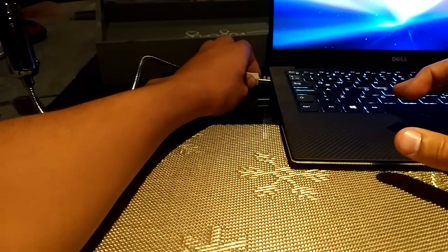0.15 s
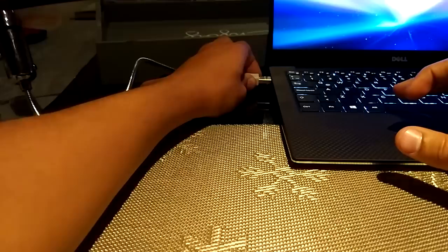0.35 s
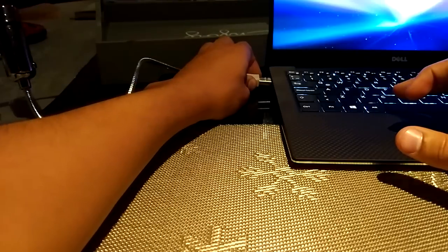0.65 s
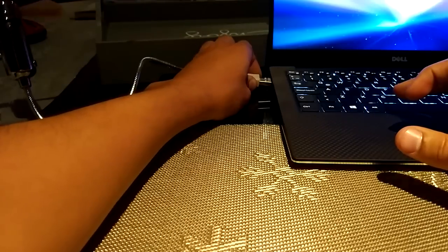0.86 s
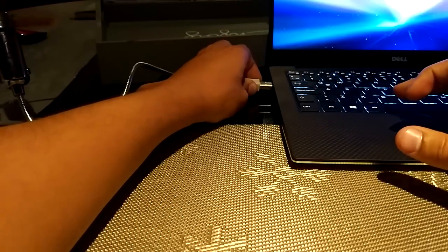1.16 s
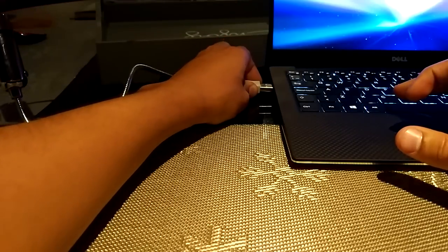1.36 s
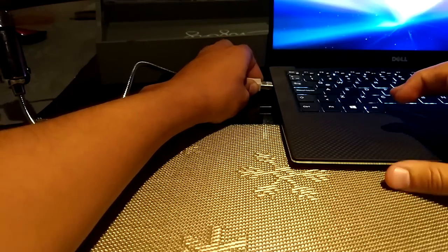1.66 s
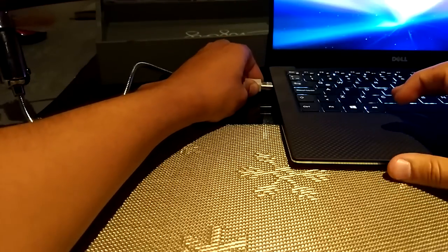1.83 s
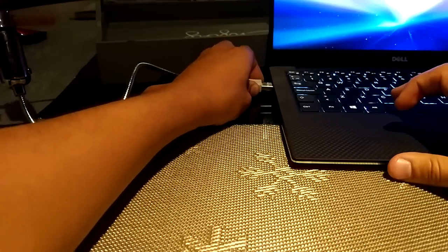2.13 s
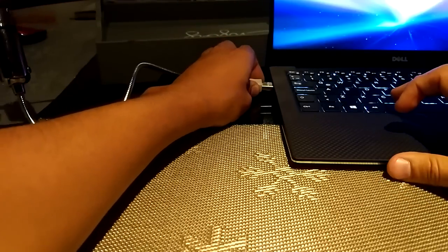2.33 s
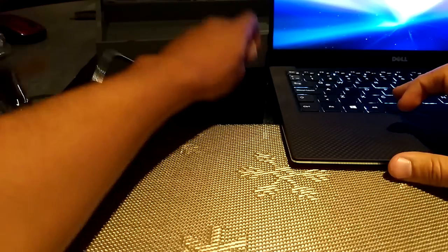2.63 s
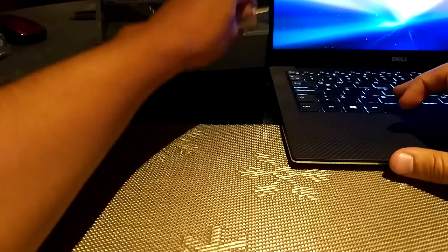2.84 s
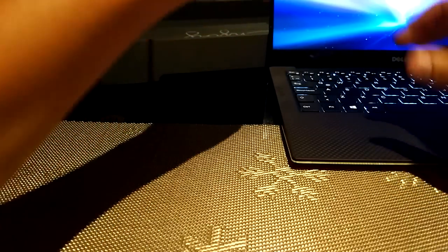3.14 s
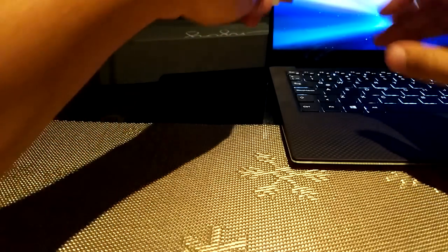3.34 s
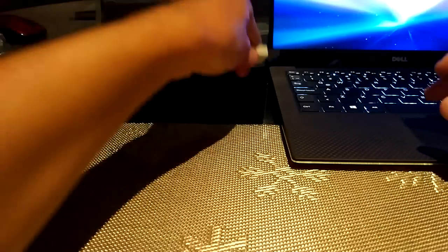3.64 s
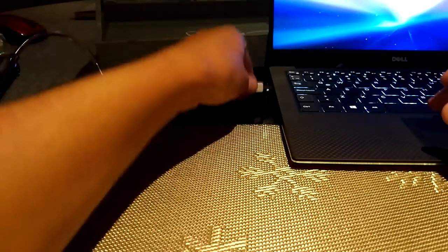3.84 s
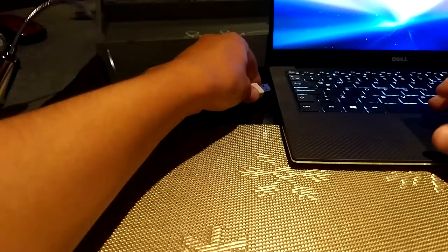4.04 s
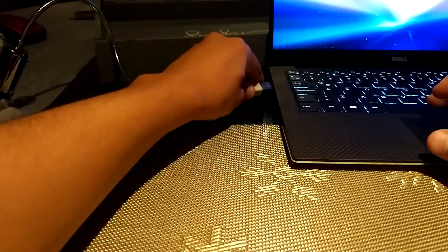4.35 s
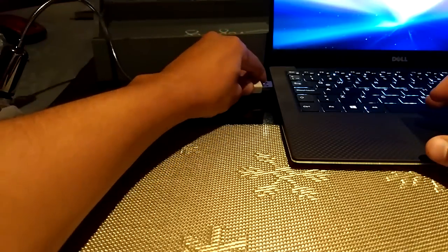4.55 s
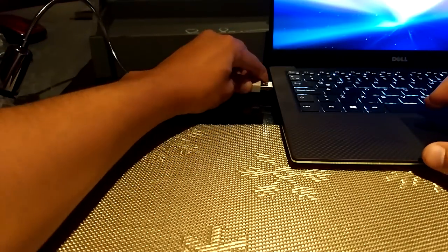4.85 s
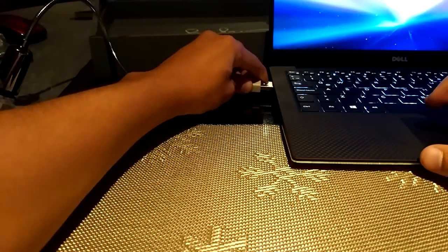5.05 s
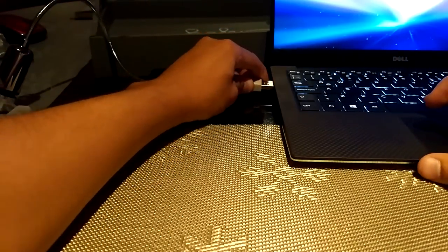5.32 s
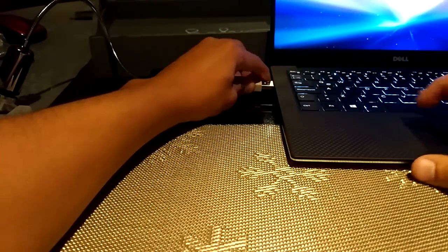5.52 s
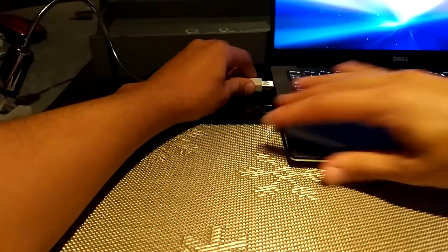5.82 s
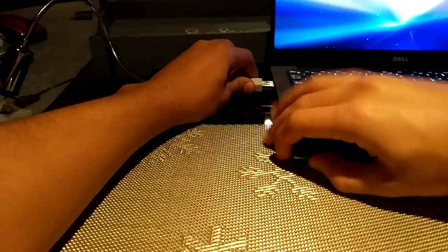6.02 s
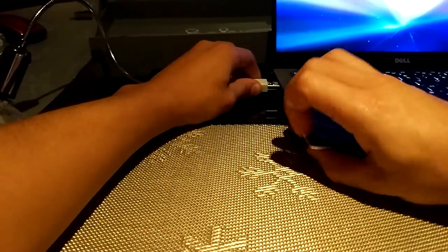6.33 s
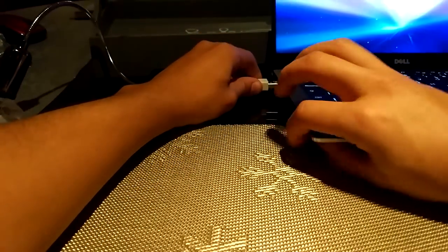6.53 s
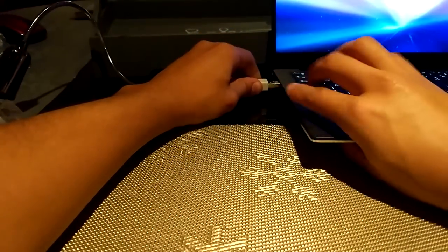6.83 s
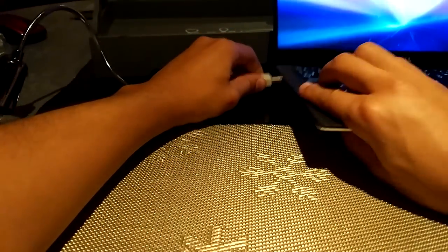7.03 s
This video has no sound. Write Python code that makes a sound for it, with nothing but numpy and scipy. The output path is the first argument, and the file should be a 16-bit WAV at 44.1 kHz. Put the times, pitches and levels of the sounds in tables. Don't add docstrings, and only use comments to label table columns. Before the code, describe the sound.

Small metallic clicks and plastic case knocks, a sudden bright clatter with a table thud, then light scrapes over a faint fan hum.

```python
import sys
import numpy as np
from scipy import signal
from scipy.fft import rfft, irfft, next_fast_len
from scipy.io import wavfile
from scipy.ndimage import uniform_filter1d

SR = 44100
rng = np.random.default_rng(int(sys.argv[2]) if len(sys.argv) > 2 else 0)


def dump(signal):
    limited = np.clip(np.atleast_2d(signal).T, -1, 1)
    pcm = np.round(limited * 32767).astype(np.int16)
    wavfile.write(sys.argv[1], SR, pcm)


def rack_gain(trim_db):
    fader = np.asarray(trim_db, float)
    return 10 ** (fader / 20)


N = 316638


def evened(x):
    return x / np.sqrt(np.mean(x ** 2) + 1e-20)


def read(points, hz):
    f, value = np.transpose(points)
    return np.interp(np.log(hz + 1), np.log(f + 1), value)


def colour(x, points):
    size = next_fast_len(x.shape[-1])
    gain = rack_gain(read(points, np.fft.rfftfreq(size, 1 / SR)))
    return irfft(rfft(x, size) * gain, size)[..., :x.shape[-1]]


def resonate(x, hz, width):
    pole = np.exp((2j * np.pi * hz - np.pi * width) / SR)
    return 2 * signal.lfilter([1 - abs(pole)], [1, -pole], x).real


def mode(t, hz, db, t60, phase):
    return rack_gain(db - 60 * t / t60) * np.sin(2 * np.pi * (hz * t + phase))


def add(mix, s, sound):
    part = mix[..., round(s * SR):][..., :sound.shape[-1]]
    part += sound[..., :part.shape[-1]]


# (frequency [Hz], level [dB])
TONE_SPECTRUM = [(15, -91), (25, -30), (74, -52), (108, -26.5), (140, -31), (160, -16.5), (232, -3),
                 (337, -11.5), (406, -10), (451, -15), (488, -13), (923, -16.5), (1170, -17), (3210, -30.5),
                 (14200, -34.5)]
# (time [s], level [dB])
ARM_STIR = [(0.0, -50), (2.56, -50.5), (2.8, -46.5), (3.16, -51), (3.58, -49.5), (3.72, -43), (4.1, -48.5),
            (4.56, -49), (5.0, -46.5), (5.46, -47.5), (6.56, -46), (7.18, -45)]
# (frequency [Hz], coherence [-1 to 1])
COHERENCE = [(60, 0.7), (120, 0.92), (240, 0.97), (480, 0.41), (950, -0.4), (1890, -0.15), (3770, -0.14),
             (7520, -0.23), (15000, 0.6)]


def room_tone():
    frames, hz = N // 512 + 5, np.fft.rfftfreq(2048, 1 / SR)
    a, b, c, d, patches = rng.standard_normal((5, len(hz), frames))
    patches = evened(uniform_filter1d(uniform_filter1d(patches, 16, 0), 6, 1))
    left, other = a + 1j * b, c + 1j * d
    same = np.clip(read(COHERENCE, hz), -1, 1)[:, None]
    z = np.array([left, same * left + np.sqrt(1 - same ** 2) * other])
    z *= rack_gain(read(TONE_SPECTRUM, hz)[:, None] + 1.0 * patches)
    steady = signal.istft(z.mean(0), nperseg=2048, noverlap=1536)[1]
    scale = rack_gain(-54.5) / np.sqrt(np.mean(steady ** 2))

    s, stir_db = np.transpose(ARM_STIR)
    stir_db = np.interp(np.arange(frames) * 512 / SR, s, stir_db - np.median(stir_db) + 2.0)
    low = 1 / (1 + (hz / 2500) ** 2) / (1 + (150 / (hz + 1)) ** 4)
    z *= rack_gain(low[:, None] * stir_db)
    return scale * signal.istft(z, nperseg=2048, noverlap=1536)[1][:, :N]


# (frequency [Hz], level [dB])
FAN_LINES = [(177.6, -69), (242.2, -70), (409.1, -72.5), (479.1, -71.5), (527.6, -70.5), (1174, -79.5)]


def fan():
    hum = np.zeros(N)
    for hz, db in FAN_LINES:
        line = resonate(resonate(rng.standard_normal(N), hz, 9.7), hz, 9.7)
        hum += rack_gain(db + 3) * evened(line)
    return hum


def matched(bare, sound):
    return bare * np.linalg.norm(sound[0]) / np.linalg.norm(bare)


def crackle(share, t60, db, hz, band_hz):
    t = np.arange(2048) / SR
    grit = rng.standard_normal((2, len(t)))
    grit[1] = .5 * grit[0] + 1.28 * grit[1]
    grit *= (1 - np.exp(-t / 0.001)) * (rack_gain(-60 * t / t60) + 0.046 * rack_gain(-60 * t / 0.073))
    impulse = 1.0 * (t == 0)
    tick, bare = (resonate(resonate(g, hz, band_hz), hz, band_hz) + share * g for g in (grit, impulse))
    tick *= rack_gain(db + 1.5) / abs(tick).max()
    return tick, matched(bare, tick)


# (frequency ratio, level [dB], t60 [s])
CASE_MODES = [(1.016, 4, 0.011), (.82, -20.5, 0.059), (1.056, -15.0, 0.017),
              (1.514, -16.5, 0.02), (2.1, -16.5, 0.016), (0.559, -16.5, 0.022)]


def case_knock(db, hz):
    t = np.arange(2048) / SR
    knock = np.zeros((2, len(t)))
    for ratio, mode_db, t60 in CASE_MODES:
        port_phase = rng.random() * np.array([[0.19], [0]])
        knock += mode(t, hz * ratio, mode_db, t60, port_phase + rng.random())
    knock *= rack_gain(db + 17.5) * (1 - np.exp(-t / .0012)) ** 2
    bare = resonate(resonate(1.0 * (t == 0), hz, 1.2 * hz), hz, 1.2 * hz)
    return knock, matched(bare, knock)


def strike(near, far, s, blow, room_db):
    sound, bare = blow
    add(near, s, sound)
    add(far, s, rack_gain(room_db) * bare)


# (time [s], tick level [dB], tick pitch [Hz], knock level [dB], knock pitch [Hz])
PORT_TOUCHES = [(0.1231, -46, 2540, -57, 1000), (0.2135, -52, 3200, -61.5, 1260),
                (0.5719, -31.5, 3280, -51.5, 1110), (0.7741, -35, 2760, -54, 2100),
                (1.6008, -31, 4800, -32.5, 1264), (1.6185, -42, 3600, -47, 980),
                (1.7115, -37, 6570, -40, 1110), (1.9671, -27, 10500, -34, 1183),
                (2.603, -39.5, 4310, -59, 1750), (2.8643, -38, 2780, -51, 960),
                (4.0298, -34, 3420, -58, 923), (4.6309, -43, 4380, -57, 954), (4.811, -32, 5600, -37, 1190),
                (4.8276, -39.5, 5000, -55, 1260), (5.0222, -42, 2770, -55, 1190),
                (5.2135, -59.5, 3120, -49.5, 895), (5.3677, -43, 2800, -49, 1200),
                (5.9959, -33, 3000, -48.5, 2210), (6.1882, -36, 3500, -55, 2320),
                (7.0404, -40, 4500, -54.5, 1090), (7.1652, -40, 8730, -58, 1040)]


def touches(near, far):
    for s, tick_db, tick_hz, knock_db, knock_hz in PORT_TOUCHES:
        strike(near, far, s, crackle(0.27, 0.0077, tick_db, tick_hz, 1.3 * tick_hz), -14.5)
        strike(near, far, s, case_knock(knock_db, knock_hz), -14.5)


# (time [s], low mode [dB], middle mode [dB], high modes [dB], rise [s])
TABLE_JOLTS = [(0.571, -38.5, -50, -52, 0.0032), (0.779, -42.5, -67, -59, 0.004),
               (1.601, -43, -56, -50, 0.004), (1.968, -37, -46, -44, 0.0055),
               (2.584, -61, -56, -46.5, 0.0097), (2.625, -62, -66, -48, 0.018),
               (2.861, -68, -62, -43, 0.0036), (2.894, -44, -57, -64, 0.0055),
               (3.558, -23, -28.5, -26, 0.009), (3.571, -25, -36, -49, 0.0068),
               (3.704, -36.5, -40, -35.5, 0.0054), (3.716, -28, -41, -49, 0.0078),
               (3.812, -55, -49, -41, 0.0077), (4.056, -48, -55, -48, 0.0032),
               (4.273, -30.5, -36.5, -31, 0.0018), (4.291, -37, -58, -39, 0.0053),
               (5.999, -38, -53, -49.5, 0.0031), (6.217, -33.5, -40, -44, 0.004),
               (6.241, -45, -58, -34.5, 0.0068), (6.687, -35.5, -51, -61, 0.0036),
               (6.799, -32, -65, -58, 0.0035)]
# (frequency [Hz], level [dB], t60 [s])
TABLE_MODES = [(280.2, 4, 0.045), (480, 11.5, 0.047), (630, -4, 0.087), (704.2, 1.5, 0.11)]


def thuds(near, far):
    t = np.arange(SR // 2) / SR
    for s, low_db, middle_db, high_db, rise in TABLE_JOLTS:
        sound = np.zeros(len(t))
        for jolt_db, (hz, db, t60) in zip([low_db, middle_db, high_db, high_db], TABLE_MODES):
            sound += mode(t, hz * rng.normal(1, 0.0068), jolt_db + db, t60, rng.random())
        sound *= 1 - np.exp(-t / rise)
        add(near, s, sound[None])
        add(far, s, rack_gain(-4.5) * sound)


def sound_notes(near, far, notes):
    t = np.arange(SR // 2) / SR
    for s, db, hz, t60 in notes:
        note = mode(t, hz, db, t60, rng.random(2)[:, None] * 0.25)
        note *= 1 - np.exp(-t * hz / 2.6)
        add(near, s, note)
        add(far, s, rack_gain(-12) * note[0])


# (time [s], level [dB], frequency [Hz], t60 [s])
SHELL_PINGS = [(1.9672, -23, 5170, .012), (1.9674, -20, 6450, .014), (1.9674, -28, 3250, .02),
               (1.9674, -31, 2640, .016), (1.985, -46, 1650, .15), (1.601, -38, 2100, .02),
               (1.601, -33, 3200, .012), (2.866, -45, 760, .08), (1.7118, -35, 6400, .012),
               (2.603, -43, 4310, .025), (4.2725, -36, 4760, .03), (4.29, -48, 4764, .4),
               (4.295, -42, 3360, .15), (4.3, -48, 2283, .3), (4.3, -44, 1615, .25),
               (3.704, -32, 1950, .04), (3.704, -31, 2330, .06), (3.704, -38, 3830, .12),
               (6.189, -44, 3600, .02), (6.219, -44, 2050, .03), (6.219, -46, 2750, .03),
               (6.24, -46, 2000, .03), (6.225, -44, 3500, .06), (.5722, -44, 2150, .025),
               (4.505, -42, 480, .04)]


def pings(near, far):
    sound_notes(near, far, SHELL_PINGS)


# (time [s], tick level [dB], tick pitch [Hz])
LIGHT_GRAZES = [(1.957, -44, 4000), (2.125, -42, 5500), (2.5684, -48.5, 2650), (2.6868, -46.5, 6000),
                (2.794, -44, 3800), (2.836, -49, 8820), (3.1434, -45, 2770), (3.211, -39.5, 11500),
                (3.3158, -43, 10600), (4.0962, -27, 7940), (5.684, -41.5, 4600), (5.731, -29.5, 8640),
                (5.8417, -50.5, 5040), (6.306, -41, 7000), (6.327, -37, 11000), (6.5077, -33.5, 7700),
                (6.6397, -45, 9730), (6.8003, -40, 10800), (7.1538, -30.5, 8200), (6.7387, -48, 7600),
                (6.937, -48, 12000), (7.1124, -47, 8700), (5.794, -41, 9500), (3.229, -46, 12500)]


def grazes(near, far):
    for s, db, hz in LIGHT_GRAZES:
        strike(near, far, s, crackle(.08, 0.0064, db, hz, 4600), -14.5)
        strike(near, far, s, case_knock(db - 26, 1150), -14.5)


# (time [s], level [dB], pitch [Hz], room send [dB])
HARD_SNAPS = [(3.5364, -35, 10000, -8), (3.5418, -30, 11100, -17), (3.5524, -18, 3900, -11),
              (3.5526, -20, 11000, -11), (3.5577, -20, 6300, -4), (3.5692, -8.5, 10500, 0),
              (3.5693, -15.5, 3120, -2), (3.5698, -17, 4300, -3), (3.5727, -14.5, 9000, -8),
              (3.704, -17, 8900, -3), (3.7035, -22, 2060, -11), (3.719, -14, 9400, -2.5),
              (3.7324, -30, 9320, -21), (4.2715, -24, 7500, -2), (4.272, -26, 4430, -4),
              (4.272, -25, 1930, -12), (4.2806, -31, 2330, -9), (4.5028, -47, 4420, -3),
              (4.8541, -49, 10000, 4), (6.2189, -35.5, 2300, 0), (6.239, -36, 2600, -6),
              (1.9672, -25, 5170, -12), (1.967, -25, 6450, -6), (1.9674, -28.5, 2900, -11),
              (4.233, -40, 2300, -10), (4.2335, -34, 9200, -10), (6.189, -43, 2400, -12),
              (6.274, -46, 2200, -8)]
# (time [s], level [dB], pitch [Hz], room send [dB])
HARD_KNOCKS = [(1.9672, -35, 1496, -11), (3.5418, -50, 870, -17), (3.5525, -46, 2580, 4),
               (3.5574, -34, 940, 6), (3.5692, -39.5, 2390, -1), (3.5693, -36, 430, -4),
               (3.704, -36.5, 2040, -1), (3.707, -35.5, 960, -4.5), (3.7194, -34, 937, -2),
               (4.2715, -35, 2420, -9), (4.2715, -27, 1255, -1), (4.272, -32.5, 990, -11),
               (4.2804, -37, 1440, -7), (4.2914, -35, 1110, -4), (4.5028, -50, 1300, -3),
               (4.5187, -53, 1110, 0.5), (4.8541, -53, 890, 4), (6.2178, -42, 1110, 1),
               (6.219, -42, 1380, -9), (6.2394, -41, 970, -15)]


def hard_blows(near, far):
    for s, db, hz, room_db in HARD_SNAPS:
        strike(near, far, s, crackle(0.27, 0.0062, db, hz, 0.5 * hz), room_db)
    for s, db, hz, room_db in HARD_KNOCKS:
        strike(near, far, s, case_knock(db, hz), room_db)


# (time [s], level [dB], frequency [Hz], t60 [s])
GRIP_BOUNCES = [(3.725, -33, 957, 0.066), (3.765, -43, 985, .1), (3.81, -43, 950, .08),
                (3.845, -43, 960, 0.065), (3.85, -41, 717, .06), (3.905, -49, 740, .06),
                (3.925, -46, 900, .08), (3.94, -47, 680, 0.076), (4.064, -41, 1020, 0.045),
                (3.612, -40, 1300, 0.037), (3.72, -34, 2290, 0.069), (6.335, -54, 1270, .15),
                (6.39, -50, 1270, 0.17), (6.43, -52, 1250, .08), (1.968, -42, 630, 0.054)]


def bounces(near, far):
    sound_notes(near, far, GRIP_BOUNCES)


# (time [s], level [dB])
SLEEVE_TOUCHES = [
    (1.972, -41.5),
    (4.275, -44),
]
# (frequency [Hz], t60 [s])
SLEEVE_MODES = [(1600, .03), (2520, 0.027)]


def sleeve(far):
    t = np.arange(SR // 2) / SR
    for s, db in SLEEVE_TOUCHES:
        add(far, s, sum(mode(t, hz, db, t60, rng.random()) for hz, t60 in SLEEVE_MODES))


# (rise [s], top time [s], fall [s], pressure [dB], dull share [dB])
CABLE_STROKES = [(.04, 2.786, 0.054, -58, -1), (0.029, 2.84, 0.052, -53, -1), (.04, 2.7, .04, -69, 2),
                 (.04, 3.076, .2, -60.5, -2.5), (.04, 3.9, 0.15, -59.5, 2), (0.059, 4.026, 0.054, -45, -5),
                 (.05, 4.09, 0.11, -55.5, 0), (0.065, 4.235, 0.2, -47, -3),
                 (0.0066, 4.272, 0.079, -43, 6.5), (.02, 4.635, 0.087, -66, 4.5),
                 (0.055, 4.745, .02, -63.5, -0.5), (0.095, 6.37, 0.055, -52.5, -3),
                 (.05, 6.42, .2, -63.5, 1.5), (.015, 6.508, 0.048, -60, -18),
                 (.012, 6.642, 0.11, -56.5, -13), (0.042, 6.757, .025, -57.5, -3),
                 (.014, 6.2, 0.032, -56, -8), (.015, 6.906, .1, -60.5, -2), (.05, 7.05, .05, -64.5, 4),
                 (0.089, 7.112, .07, -55, -10), (.05, 7.175, .02, -57, -4)]
# (rise [s], top time [s], fall [s], pressure [dB], dull share [dB])
HAND_STROKES = [
    (0.064, 3.228, 0.018, -60.5, -11),
    (.02, 5.68, .02, -63, -10),
    (0.081, 5.792, .012, -54.5, -12),
    (.012, 5.745, .07, -58.5, -7),
    (.02, 5.3, .02, -69, -3),
    (.01, 6.305, 0.046, -67, -11),
    (.012, 6.655, 0.071, -63, -14),
    (.01, 6.915, 0.026, -65, -8),
]
# (frequency [Hz], density [dB per Hz])
CABLE_FIZZ = [(3290, -19), (5600, -4), (6330, -2), (9500, 1), (11500, 0), (14000, -11)]
# (frequency [Hz], density [dB per Hz])
HAND_FIZZ = [(3500, -30), (5000, -9), (8000, -3), (12500, 1), (14500, -3)]


def rubs():
    out = np.zeros((2, N))
    unevenness = evened(uniform_filter1d(rng.standard_normal(N), 90))
    slips = rng.standard_normal((2, N)) * rack_gain(2.9 * unevenness)
    slips[1] += 0.23 * slips[0]
    scrape = evened(colour(slips[:, ::-1], [(700, -24), (2200, 11), (5000, 3.5), (8000, -7)]))
    t, t_fine = np.arange(0, N + 32, 32) / SR, np.arange(N) / SR
    for strokes, pan_db, rub in [(CABLE_STROKES, 2.5, CABLE_FIZZ), (HAND_STROKES, 14.5, HAND_FIZZ)]:
        fizz = evened(colour(slips, [(2500, -55)] + list(rub)))
        bright, dull = np.zeros((2, len(t)))
        for rise, top, fall, pressure_db, dull_db in strokes:
            away = np.where(t < top, (top - t) / rise, (t - top) / fall)
            power = rack_gain(2 * (pressure_db - 18 * np.minimum(away, 8) ** 1.33))
            bright += power
            dull += rack_gain(2 * dull_db) * power
        rubbing = np.interp(t_fine, t, np.sqrt(bright)) * fizz
        rubbing += np.interp(t_fine, t, np.sqrt(dull)) * scrape
        out += rack_gain(np.array([pan_db, -pan_db]) / 2)[:, None] * rubbing
    return out


# (time [s], level [dB], share of ring time the hand leaves)
CABLE_END_STRIKES = [
    (3.5525, -18, .8),
    (3.5693, -9, .75),
    (3.704, -16, .65),
    (3.7196, -18, .6),
]
# (frequency [Hz], level [dB], t60 [s])
METAL_MODES = [(1906, -8, .3), (2659, -8, .3), (2896, -6, .3), (3055, -4, .3), (3219, -9, .3),
               (3408, -5, .3), (3674, -4, .35), (3919, -4, .35), (4188, -3, .18), (4328, -2, .25),
               (4642, -4, .23), (4830, -5, .2), (4958, -9, .25), (5160, -4, .3), (5680, -1, .3),
               (5938, -6, .2), (6170, -6, .3), (6749, 3, .2), (7095, -8, .3), (7709, 3, .18),
               (8319, -5, .2), (9118, -2, .2), (9308, -3, .25), (9997, -5, .2), (10680, -2, .2),
               (10915, -3, .2), (11385, -1, .2), (12099, -2, .25), (13600, -6, .2), (14031, -1, .25),
               (14190, 2, .2)]


def cable_end(near, far):
    t = np.arange(SR // 2) / SR
    for s, strike_db, free in CABLE_END_STRIKES:
        ring = np.zeros(len(t))
        for hz, db, t60 in METAL_MODES:
            ring += mode(t, hz, db + 2.5 * rng.standard_normal(), free * t60, rng.random())
        add(near, s, rack_gain(strike_db - 30) * ring[None])
        add(far, s, rack_gain(strike_db - 35) * ring)


# (frequency [Hz], t60 [s])
ROOM_T60 = [(200, 0.44), (600, 0.43), (1500, 0.65), (4000, 0.7), (8000, 0.48), (14000, 0.36)]


def room(x):
    size = SR // 2
    taps = np.zeros((2, size))
    at = np.arange(120, size - 20, 20)
    at = at + rng.integers(0, 20, (2, len(at)))
    np.put_along_axis(taps, at, rng.choice([-1., 1.], at.shape), 1)
    taps *= np.clip(np.arange(size) / SR / .01, 0, 1) ** 2
    hz, t, z = signal.stft(taps, SR, nperseg=256)
    bass = 1 / (1 + (hz[:, None] / 500) ** 3)
    z[1] = bass * z[0] + np.sqrt(1 - bass ** 2) * z[1]
    tail = signal.istft(z * rack_gain(-60 * t / read(ROOM_T60, hz)[:, None]), SR, nperseg=256)[1]
    tail /= np.linalg.norm(tail, axis=1)[:, None]
    return signal.fftconvolve(x[None], tail, axes=1)[:, :N]


# (frequency [Hz], left over right [dB])
LEFT_TREBLE = [(200, -1), (500, -1), (1000, 1), (2000, -.5), (4000, 1), (8000, 4), (12000, 10), (14000, 11)]
# (frequency [Hz], gain [dB])
LOW_CUT = [(30, -29), (70, -28), (110, -22), (170, -4), (230, 0)]


def ports(near, far, sliding):
    near[1] = np.roll(near[1], round(.00007 * SR))
    heard = near + room(far + rack_gain(-6.5) * sliding.mean(0))
    half = np.array(LEFT_TREBLE) * [1, .5]
    heard = np.array([colour(heard[0], half), colour(heard[1], half * [1, -1])])
    return colour(heard + sliding, LOW_CUT)


def scene():
    tone = room_tone() + fan()
    near, far = np.zeros((2, N)), np.zeros(N)
    for source in (touches, thuds, pings, grazes, hard_blows, bounces):
        source(near, far)
    sleeve(far)
    sliding = rubs()
    cable_end(near, far)
    return ports(near, far, sliding) + tone


# (frequency [Hz], gain [dB])
BAND_LIMIT = [(13900, 0), (14200, -5), (14500, -36), (15200, -42), (16000, -58), (17000, -90)]


def input_stage(x):
    limit = .45
    return colour(limit * np.tanh(x / limit), BAND_LIMIT)


def top_cut(x):
    return signal.sosfilt(signal.butter(12, 15640, fs=SR, output="sos"), x)


def record(dry):
    mix = input_stage(dry)
    return top_cut(mix)


dry = scene()
out = record(dry)
dump(out)
```